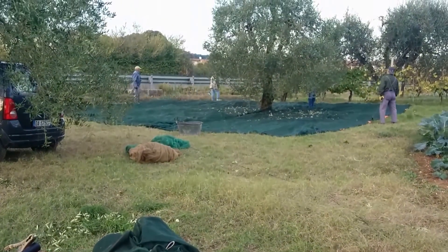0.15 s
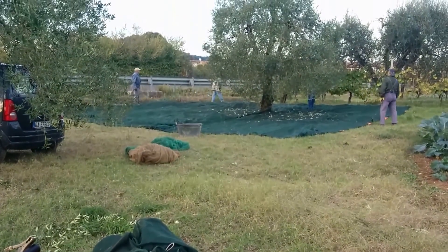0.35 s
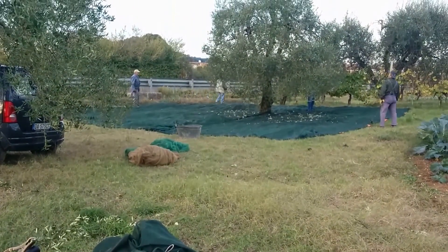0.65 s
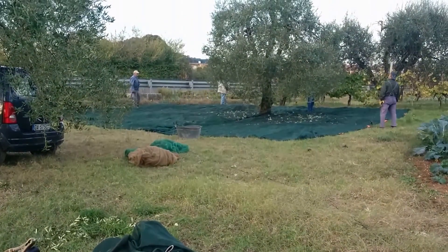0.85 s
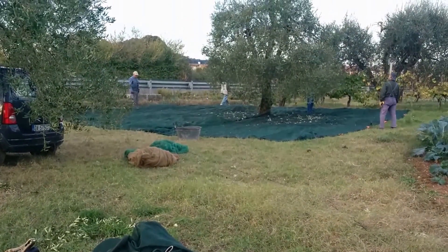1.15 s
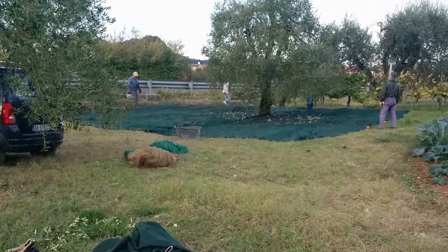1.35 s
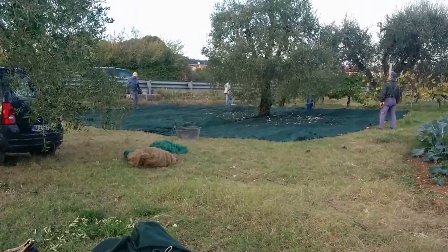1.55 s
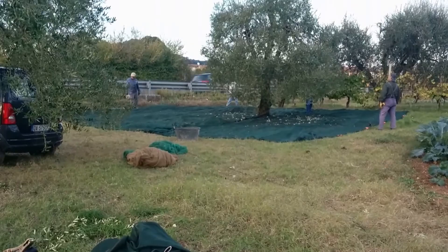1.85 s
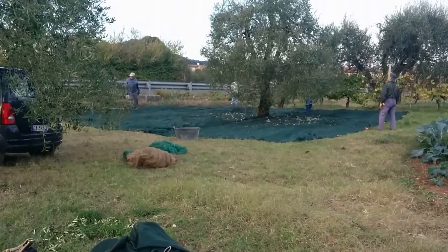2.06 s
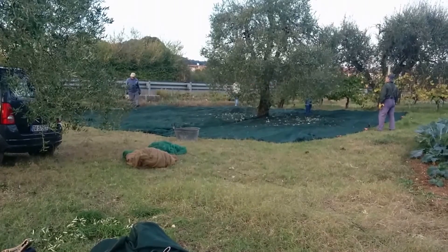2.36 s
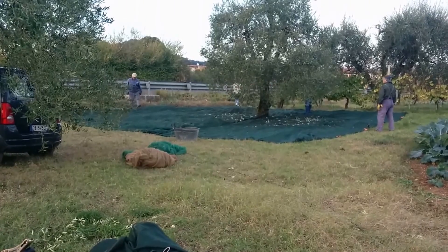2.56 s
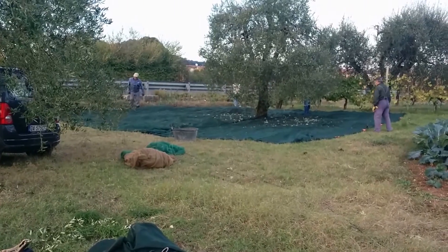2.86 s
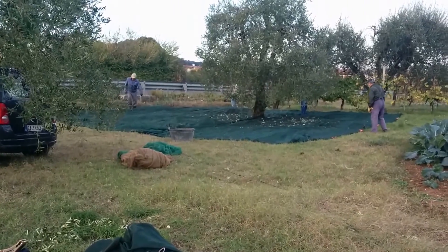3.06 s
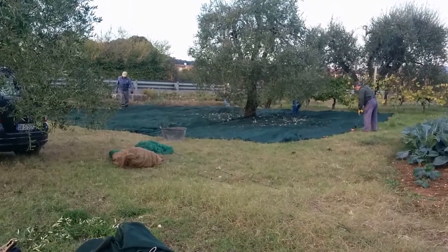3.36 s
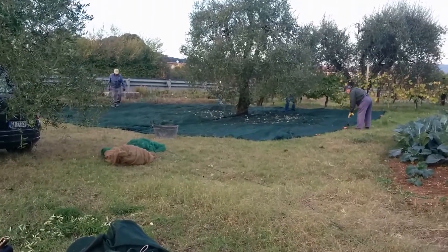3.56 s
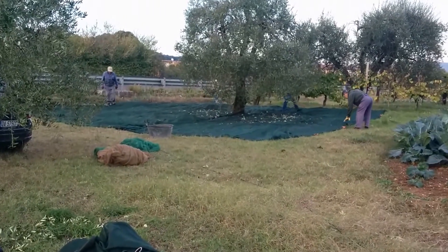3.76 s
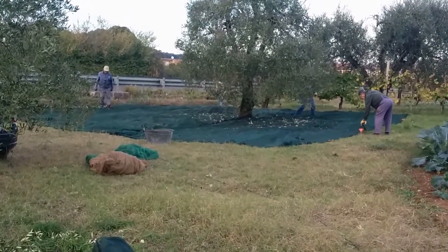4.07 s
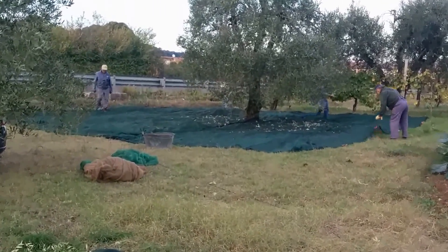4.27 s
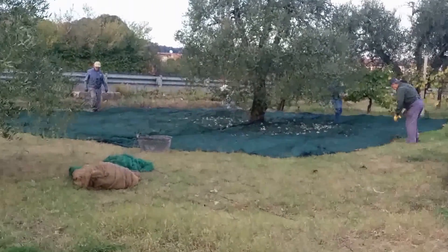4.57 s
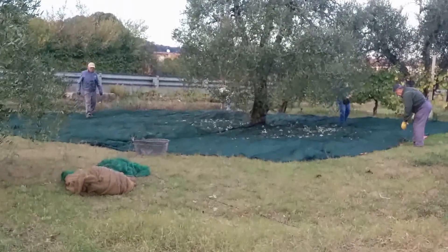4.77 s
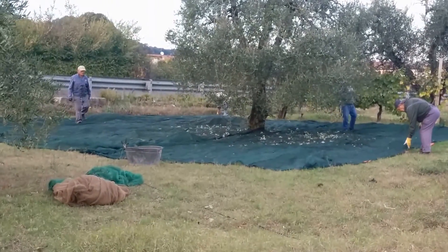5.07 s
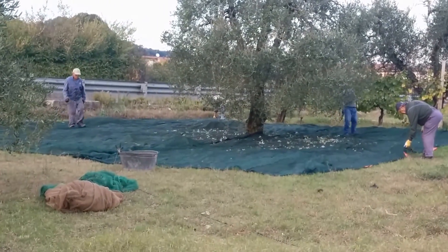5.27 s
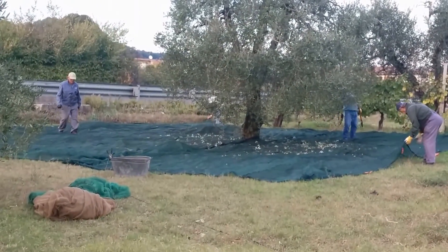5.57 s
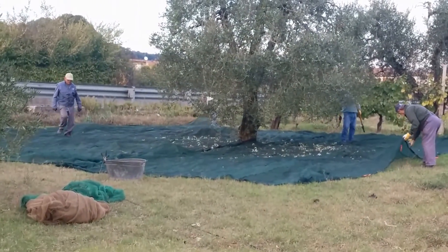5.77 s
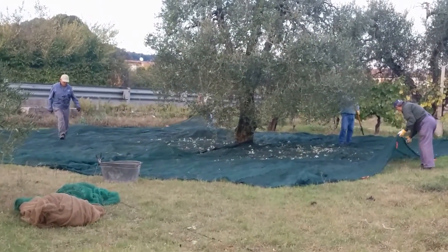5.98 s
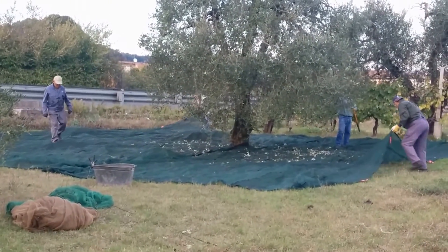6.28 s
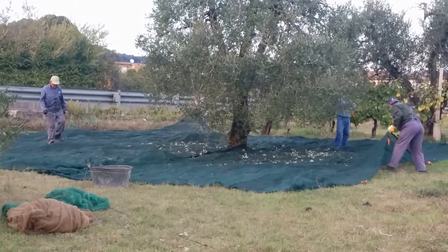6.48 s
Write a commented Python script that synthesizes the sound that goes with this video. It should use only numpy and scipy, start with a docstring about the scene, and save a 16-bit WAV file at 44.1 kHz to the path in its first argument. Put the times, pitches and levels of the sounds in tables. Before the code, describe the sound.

Uneven road noise swells and fades behind an olive grove, with two loud hollow knocks, small crackles, scuffs and dull ground bumps.

```python
"""Cars pass behind an olive grove: tyres roar and hiss as shaped noise over a lumpy rumble, and one engine
soon drones by as two sine harmonics. Twigs crackle, airy treble swishes and soft scuffs sound where people lay
out a harvest net, all from short or swelling noise. A sharp, hollow knock rings out just before each of two
lulls: damped modes with a noise crack, scattered among the trees. Dull thuds follow the first knock, and after
the second lull the rush builds again to the end."""
import sys
import numpy as np
from scipy import signal
from scipy.fft import rfft, irfft, next_fast_len
from scipy.io import wavfile
from scipy.ndimage import uniform_filter1d, map_coordinates

SR = 44100
rng = np.random.default_rng(int(sys.argv[2]) if len(sys.argv) > 2 else 0)


def log_audio(samples):
    """Write samples as a 16-bit WAV file to the path given in sys.argv[1]."""
    # one column per channel
    frames = np.atleast_2d(samples).T
    # limit to full scale, then quantise
    limited = np.clip(frames, -1, 1)
    pcm = np.round(limited * 32767).astype(np.int16)
    wavfile.write(sys.argv[1], SR, pcm)


N = 292633  # length [samples]


def amp(db):
    """Decibels to gain."""
    return 10 ** (np.asarray(db) / 20)


def unit(x):
    """Scale to rms 1."""
    return x / np.sqrt(np.mean(x ** 2) + 1e-20)


def along(points, hz):
    """Read (frequency, value) points on a log frequency axis."""
    point_hz, values = np.transpose(points)
    return np.interp(np.log(hz + 1), np.log(point_hz), values)


def curves(rows):
    """One value per sample for each column after the time."""
    times, *columns = np.transpose(rows)
    return [np.interp(np.arange(N) / SR, times, column) for column in columns]


def wobble(rate, size=N):
    """A smooth random curve through rate knots a second."""
    knots = rng.standard_normal(int(size * rate / SR) + 4)
    return map_coordinates(knots, [np.arange(size) * rate / SR])


def filtered(x, response):
    """Shape x by a gain that is a function of frequency."""
    size = next_fast_len(len(x) + 8192)
    gain = response(np.fft.rfftfreq(size, 1 / SR))
    return irfft(rfft(x, size) * gain, size)[:len(x)]


def noise(spectrum, size):
    """Coloured noise of rms 1."""
    white = rng.standard_normal(size)
    return unit(filtered(white, lambda hz: amp(along(spectrum, hz))))


def rush(spectrum, patchy_db):
    """Noise of rms 1 whose bands swell and fade in patches, as sound does through moving air."""
    z = signal.stft(noise(spectrum, size=N), nperseg=1024)[2]
    patches = uniform_filter1d(rng.standard_normal(z.shape), size=7, axis=0)
    patches = uniform_filter1d(patches, size=7, axis=1)
    return unit(signal.istft(z * amp(patchy_db * unit(patches)), nperseg=1024)[1][:N])


def swells(rows):
    """A gain curve of bell-shaped swells, one per (time [s], level [dB], half length [s])."""
    t = np.arange(N) / SR
    return sum(amp(db) * np.exp(-((t - s) / half) ** 2) for s, db, half in rows)


def bursts(rows, width, rise, grain_db):
    """Short crunches: grainy noise in one broad resonance, width in octaves, rise in seconds."""
    out, t = np.zeros(N), np.arange(SR // 4) / SR
    for s, db, pitch_hz, life in rows:
        white = rng.standard_normal(len(t))
        band = filtered(white, lambda hz: np.exp(-(np.log2((hz + 1) / pitch_hz) / width) ** 2))
        grains = amp(grain_db * wobble(396, size=len(t)))
        burst = band * grains * (1 - np.exp(-t / rise)) * amp(-60 * t / life)
        add(out, s - rise / 2, amp(db) * burst / np.abs(burst).max())
    return out


def add(track, s, sound):
    """Mix a sound into the track at time s."""
    part = track[round(s * SR):][:len(sound)]
    part += sound[:len(part)]


# colour of the still air: (frequency [Hz], relative density [dB])
STILL_AIR_COLOUR = [(30, -0.5), (500, -2.5), (3000, 5), (5000, 3), (9000, 1.5), (15500, -1)]


def still_air():
    """A faint, steady hiss of coloured noise."""
    return amp(-80) * noise(STILL_AIR_COLOUR, size=N)


# tyre band that the ground reflection favours as the cars move: (time [s], centre [Hz])
FAVOURED_BAND = [(.2, 1950), (.55, 1740), (.8, 1170), (1.05, 1070), (1.3, 736), (2.25, 790), (3.0, 804),
                 (4.0, 1085), (4.8, 1268), (5.5, 1020), (5.8, 830), (6.15, 1210), (6.55, 1330)]


def tyre_colour(x, lift_db, upper_db, width, upper_width):
    """The ground reflection lifts a gliding band and a second at three times its pitch; widths in octaves."""
    hz, t, z = signal.stft(x, SR, nperseg=1024)
    octaves = np.log2((hz[:, None] + 1) / np.interp(t, *np.transpose(FAVOURED_BAND)))
    lift = lift_db * np.exp(-(octaves / width) ** 2)
    lift += upper_db * np.exp(-((octaves - np.log2(3)) / upper_width) ** 2)
    return signal.istft(z * amp(lift), SR, nperseg=1024)[1][:N]


# brief dips, negative depths lift: (time [s], depth of the low end [dB], depth of the tyre noise [dB])
LEVEL_DIPS = [(0.062, 9, 13), (.24, 25, -2), (.49, 16, 1), (2.639, 29, -1), (3.05, 18, 1), (3.53, 23, 6),
              (4.58, 20, -1), (5.24, 10, 5)]
DIP_HALF_S = 0.015


def dips():
    """Decibels lost in bell-shaped dips: one curve for the low end, one for the tyre noise."""
    t = np.arange(N) / SR
    return sum(np.outer(depths, np.exp(-((t - s) / DIP_HALF_S) ** 2)) for s, *depths in LEVEL_DIPS)


# colours of rumble, boom, tyre roar, tread hiss and grit: (frequency [Hz], relative density [dB])
RUMBLE_COLOUR = [(25, -28.5), (48, -18.5), (68, 3), (100, -1), (140, -1), (195, -4.5), (250, -16.5),
                 (400, -38), (1200, -77)]
BOOM_COLOUR = [(120, -45.5), (200, 0), (245, -1), (295, -3.5), (360, -18.5), (480, -11.5), (700, -23.5),
               (1500, -76)]
ROAR_COLOUR = [(150, -45.5), (370, -6), (480, -9.5), (620, -3.5), (780, 3), (1050, -2.5), (1300, -8),
               (1700, -29.5), (2600, -47.5), (5000, -99)]
HISS_COLOUR = [(700, -51), (1100, 0), (1500, 4), (1850, 1.5), (2350, -5), (2800, -10), (3500, -38.5),
               (5000, -55), (8000, -81.5)]
GRIT_COLOUR = [(1800, -36.5), (2500, 3.5), (3000, 5.5), (3600, 0.5), (4050, -6), (4500, -14), (5600, -21.5),
               (8000, -33.5), (12000, -39), (16000, -50.5)]
# the low rumble and the boom above it, before their random lumps: (time [s], level [dB])
RUMBLE_MOVES = [(0, -54.5), (.55, -50), (1.05, -37), (1.85, -46.5), (2.6, -54), (3.1, -58), (3.5, -54.5),
                (3.7, -50), (4.4, -49.5), (4.6, -68), (4.9, -67.5), (5.45, -52.5), (6.25, -44.5),
                (6.64, -44)]
BOOM_MOVES = [(0, -55), (0.9, -43.5), (1.6, -56.5), (1.9, -52), (2.9, -63.5), (4.05, -56), (4.7, -72),
              (5.8, -56), (6.64, -48.5)]
# tyres come and go, before trims and flutter: (time [s], roar level [dB], tread hiss over the roar [dB])
TYRE_MOVES = [(0, -52, -5.5), (.14, -46, -0.5), (.45, -49, 4), (.85, -47, 4.5), (1.39, -49, -8),
              (1.47, -58, -17), (1.635, -55.5, -3.5), (1.665, -49, 2.5), (2.05, -45.5, -2.5),
              (2.53, -48, -13.5), (2.62, -61.5, -9.5), (3.1, -62.5, -11.5), (3.85, -55, -11),
              (3.88, -46, -11), (4.4, -46.5, -10), (4.52, -63, -3), (5.33, -54.5, -9.5),
              (5.48, -47.5, -8.5), (5.85, -44.5, -9), (6.17, -45.5, -1.8), (6.64, -45, 3.5)]
# stretches where the grit crunches louder, before flutter: (time [s], level [dB], half length [s])
GRIT_CRUNCHES = [(.18, -55.5, 0.25), (1.08, -67.5, 0.28), (1.98, -64, 0.33), (5.5, -76.5, .1),
                 (6.63, -58, 0.1)]
ROAR_TRIM_DB, HISS_TRIM_DB, GRIT_UNDER_HISS_DB = -2.5, -2, -17.5


def traffic():
    """Tyres roar and hiss on the asphalt and crunch its grit, over a lumpy rumble."""
    rumble_db, = curves(RUMBLE_MOVES)
    boom_db, = curves(BOOM_MOVES)
    roar_db, bright_db = curves(TYRE_MOVES)
    hiss_db = roar_db + bright_db
    grit_gain = amp(hiss_db + GRIT_UNDER_HISS_DB) + swells(GRIT_CRUNCHES)
    low_dip_db, tyre_dip_db = dips()
    # dB: turbulence on the way stirs all bands together, and the low end comes in lumps
    flutter = 1.56 * wobble(70) + 0.98 * wobble(18)
    lumps = 2.6 * wobble(25)

    rumble_gain = amp(rumble_db + flutter + lumps + 0.71 * wobble(40))
    rumble = rumble_gain * rush(RUMBLE_COLOUR, patchy_db=2.0)
    boom = amp(boom_db + flutter + 0.49 * lumps) * rush(BOOM_COLOUR, patchy_db=1.0)
    roar_gain = amp(roar_db + ROAR_TRIM_DB + flutter + 2.27 * wobble(70))
    roar = roar_gain * rush(ROAR_COLOUR, patchy_db=2.58)
    hiss_gain = amp(hiss_db + HISS_TRIM_DB + flutter + 1.6 * wobble(100))
    hiss = hiss_gain * rush(HISS_COLOUR, patchy_db=3.5)
    grit = grit_gain * amp(flutter + 3.2 * wobble(130)) * rush(GRIT_COLOUR, patchy_db=1.6)

    tyres = tyre_colour(roar + hiss, lift_db=4.0, upper_db=7.5, width=0.2, upper_width=0.052) + grit
    return amp(-low_dip_db) * (rumble + boom) + amp(-tyre_dip_db) * tyres


# the nearest car's engine, before random wander: (time [s], firing rate [Hz], level [dB])
ENGINE_PASS = [(.85, 72, -70), (1.0, 70.74, -50), (1.25, 68.9, -42), (1.5, 67.9, -59), (1.68, 68.6, -42),
               (1.77, 66, -57), (1.86, 66.3, -48), (2.05, 67.6, -77)]


def engine():
    """The exhaust drones at the firing rate and its octave, sinking a little as the car goes by."""
    hz, db = curves(ENGINE_PASS)
    phase = 2 * np.pi * np.cumsum(hz * (1 + 0.018 * wobble(10.0))) / SR
    drone = unit(np.sin(phase) + amp(-12.5) * np.sin(2 * phase))
    end = ENGINE_PASS[-1][0]
    fade_out = np.interp(np.arange(N) / SR, [end, end + 0.2], [1, 0])
    return fade_out * amp(db + 1.2 * wobble(19.0)) * drone


# crackles of twigs and dry leaves: (time [s], relative peak [dB], pitch [Hz])
TWIG_CRACKLES = [(1.047, -40, 2980), (1.163, -36, 2130), (1.230, -34.5, 3060), (1.296, -32.5, 3210),
                 (1.358, -37.5, 3100), (1.370, -33, 2970), (4.345, -51, 3000), (4.382, -44.5, 2950),
                 (4.41, -40.5, 2980), (4.46, -61, 3020), (4.553, -55, 3220), (6.594, -29.5, 3330),
                 (6.622, -44, 2980)]
# resonances of every twig: (ratio to the pitch, relative level [dB])
TWIG_RESONANCES = [(.62, -10), (1, 1.5), (1.28, -10)]
TWIG_LIFE_S = 0.086  # to fall by 60 dB


def twigs():
    """Every twig crackles in the same three resonances around its own pitch."""
    rows = [(s, db + level, hz * ratio, TWIG_LIFE_S)
            for s, db, hz in TWIG_CRACKLES for ratio, level in TWIG_RESONANCES]
    return amp(-3.0) * bursts(rows, width=0.17, rise=0.0011, grain_db=2.5)


# colour of the swishes: (frequency [Hz], relative density [dB])
SWISH_COLOUR = [(3000, -32.5), (5000, -5), (7000, -2), (9500, -1), (11500, -6.5), (15000, -22)]
# airy high swishes, of leaves or trailing a knock, before graininess:
# (time [s], level [dB], half length [s])
AIRY_SWISHES = [(1.13, -83, .14), (1.88, -78.5, 0.077), (2.41, -82, 0.088), (4.25, -80, .07),
                (5.04, -84, 0.03), (5.283, -81, 0.26), (6.58, -79, 0.08)]


def swishes():
    """Soft, grainy swells of airy treble."""
    return swells(AIRY_SWISHES) * amp(2.1 * wobble(80)) * noise(SWISH_COLOUR, size=N)


# soft bumps and scuffs: (time [s], relative peak [dB], pitch [Hz], time to fall by 60 dB [s])
SOFT_BUMPS = [(1.163, -31, 820, 0.21), (1.231, -32, 940, 0.041), (1.371, -32.5, 1520, 0.039),
              (1.577, -35.5, 714, 0.065), (2.525, -30, 1090, 0.086), (2.698, -39, 780, 0.13),
              (3.574, -37.5, 810, 0.057), (3.868, -42, 1010, .12), (4.553, -44, 1230, 0.032),
              (4.822, -36, 1110, 0.37), (4.928, -36.5, 930, 0.23), (5.054, -45, 790, 0.094),
              (5.293, -35.5, 840, 0.063), (5.391, -47, 1040, 0.027), (5.798, -30, 810, 0.035)]


def bumps():
    """Soft bumps and scuffs: bursts of grainy noise in a broad middle band."""
    return amp(-0.5) * bursts(SOFT_BUMPS, width=0.61, rise=0.00204, grain_db=3.5)


# colour of the grove's answer, before each knock's brightness: (frequency [Hz], relative density [dB])
SCATTER_COLOUR = [(40, -8.5), (80, -21.5), (200, -1.5), (330, 4), (500, 5.5), (650, -4.5), (950, 0.5),
                  (1400, -10.5), (2600, -22), (3700, -35.5), (4600, -62), (9000, -60.5), (15000, -74.5)]
# how long the far trees linger: (frequency [Hz], time to fall by 60 dB [s])
GROVE_DECAY = [(100, 0.67), (500, 0.4), (1500, 0.25), (4000, 0.38), (10000, .5)]


def grove(bright_db):
    """A fresh diffuse echo, arriving in clumps: near trees answer at once, far ones linger."""
    hz, t, z = signal.stft(noise(SCATTER_COLOUR, size=SR), SR, nperseg=256)
    near = amp(-24.5 - 60 * t / 0.061)
    far = amp(-29 - 60 * t / along(GROVE_DECAY, hz)[:, None])
    # the brightness tilts the treble from about 1 kHz up
    shelf = amp(bright_db * along([(800, 0.061), (1300, 1.0)], hz))[:, None]
    tail = signal.istft(z * (near + far) * shelf, SR, nperseg=256)[1]
    clumps = amp(1.4 * wobble(70, size=len(tail)))
    onset = 1 - np.exp(-np.arange(len(tail)) / SR / 0.0029)
    return tail * clumps * onset


# knocks: (time [s], level [dB], contact time [s], crack over the knock's level [dB],
#          rebound share of the blow, echo brightness [dB], echo over the knock's level [dB])
KNOCK_BLOWS = [(2.359, -1, 0.00098, -17, 0.5, -4.5, .5), (4.1722, 2.5, 0.0021, -15.5, 0.43, 3, -2)]
# modes of the struck hollow body: (frequency [Hz], relative level [dB], time to fall by 60 dB [s])
BODY_MODES = [(158, -28, 0.032), (293, -4.5, 0.027), (473, -1.5, 0.023), (592, -36, .04),
              (890, -11.5, 0.039), (997, -28.5, 0.027), (1200, -49, 0.04), (1836, -3, 0.03),
              (2380, -26.5, 0.034)]
# colour of the crack: (frequency [Hz], relative density [dB])
CRACK_COLOUR = [(300, -2.5), (900, 20), (1600, 0), (2700, -3.5), (3600, -18.5), (4300, -39.5),
                (9000, -58.5), (15000, -51.5)]
# echoes from near trunks and walls: (delay before a random shift [s], level [dB])
NEAR_ECHOES = [(0.0185, -15), (0.034, -32), (.054, -41)]
CLICK_DB = -52  # faint one-sample click just after each knock's onset, relative to the knock's level


def knocks():
    """Each blow cracks, rings the damped body and rebounds a few milliseconds later."""
    out, t = np.zeros(N), np.arange(SR // 4) / SR
    foliage = signal.butter(4, 3100, fs=SR, output="sos")  # air and foliage take the treble
    for s, db, contact, crack_db, rebound, bright_db, echo_level_db in KNOCK_BLOWS:
        ring = sum(amp(level - 60 * t / t60) * np.cos(2 * np.pi * hz * t) for hz, level, t60 in BODY_MODES)
        push = t / contact * np.exp(-(2 * t / contact) ** 2)  # longer contact gives a duller blow
        blow = signal.fftconvolve(ring, push / push.sum())[:len(t)]
        blow = signal.sosfilt(foliage, blow)
        crack_envelope = amp(crack_db - 60 * t / 0.038) * (1 - np.exp(-t / 0.0016))
        crack = crack_envelope * noise(CRACK_COLOUR, size=len(t))
        add(out, s, amp(db) * (blow + crack))
        add(out, s + 0.001, amp(db + CLICK_DB) * np.ones(1))
        add(out, s + 0.00625, amp(db) * rebound * blow)
        for delay, echo_db in NEAR_ECHOES:
            add(out, s + delay + rng.uniform(-0.00046, 0.0011), amp(db + echo_db) * blow)
        add(out, s + 0.008, amp(db + echo_level_db) * grove(bright_db))
    # the body radiates no deep bass
    return signal.sosfilt(signal.butter(2, 65, "high", fs=SR, output="sos"), out)


# dull thuds near the ground: (time [s], relative peak [dB], pitch [Hz], time to fall by 60 dB [s])
GROUND_THUDS = [(2.688, -37.5, 183, .2), (2.961, -41, 185, 0.19), (3.083, -45.5, 180, 0.11),
                (3.192, -35.5, 162, 0.28), (3.242, -31, 140, 0.52), (3.347, -32, 123, .4),
                (3.468, -43, 197, 0.079), (3.735, -35.5, 185, 0.13), (3.82, -37, 89, .14),
                (4.465, -37, 130, 0.12), (4.63, -46, 95, .16), (4.996, -35, 76, 0.13),
                (5.108, -37.5, 106, 0.11), (5.341, -39, 90, 0.21)]


def thuds():
    """Soft, low bursts of grainy noise, perhaps footfalls on the turf."""
    return amp(-1.0) * bursts(GROUND_THUDS, width=0.42, rise=0.007, grain_db=2.05)


def scene():
    """Road, knocks and small sounds of work over a faint steady hiss."""
    road = traffic() + engine()
    work = twigs() + swishes() + bumps() + knocks() + thuds()
    return (still_air() + road + work)[None]


TOP_HZ = 15750


def record(dry):
    """Cut everything above the band limit."""
    return filtered(dry[0], lambda hz: hz < TOP_HZ)[None]


dry = scene()
out = record(dry)
log_audio(out)
```